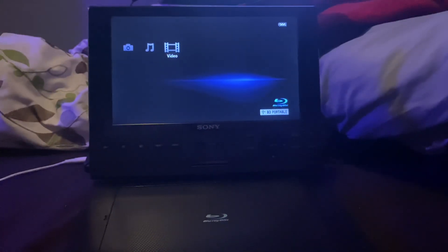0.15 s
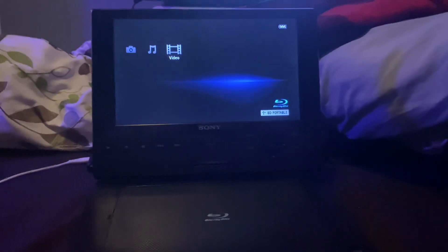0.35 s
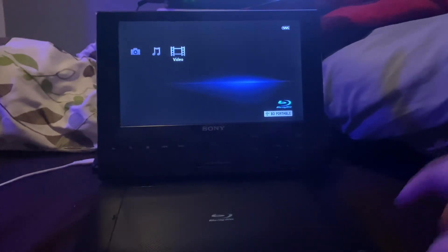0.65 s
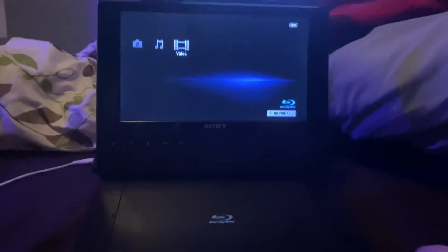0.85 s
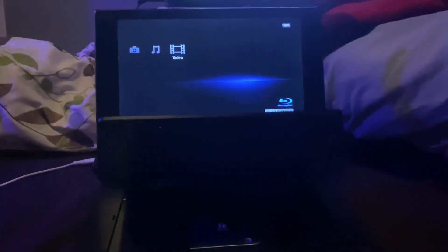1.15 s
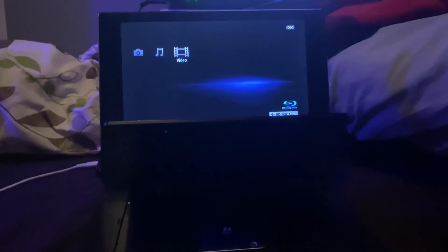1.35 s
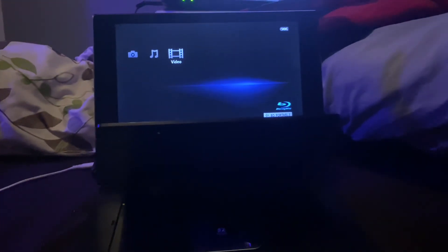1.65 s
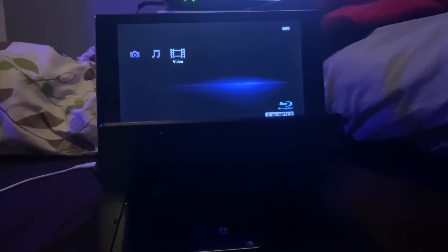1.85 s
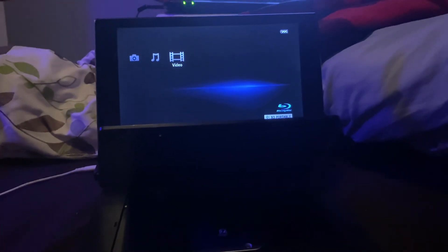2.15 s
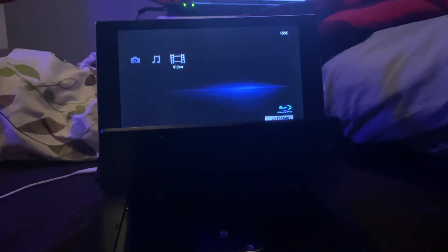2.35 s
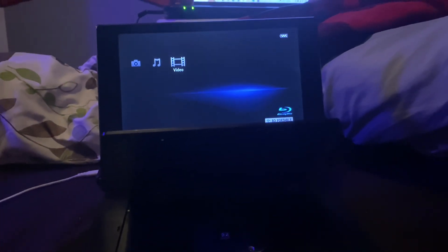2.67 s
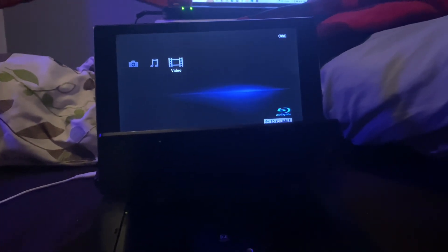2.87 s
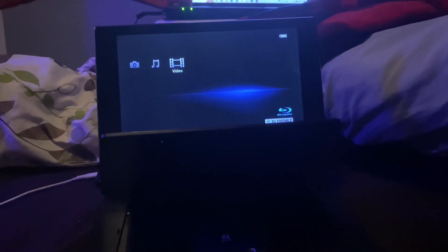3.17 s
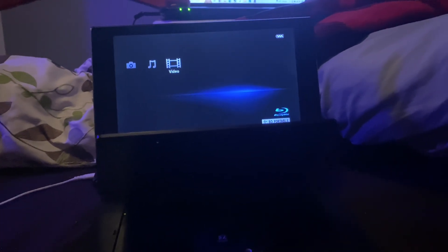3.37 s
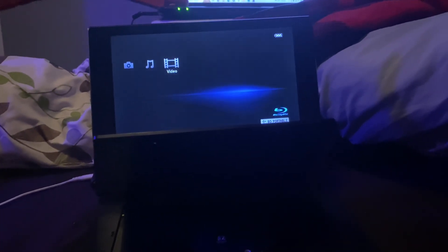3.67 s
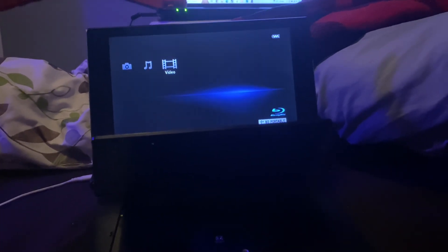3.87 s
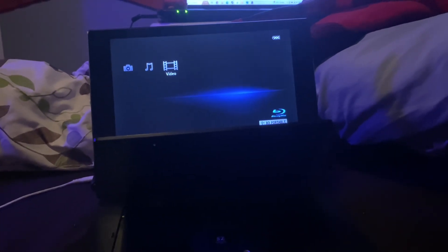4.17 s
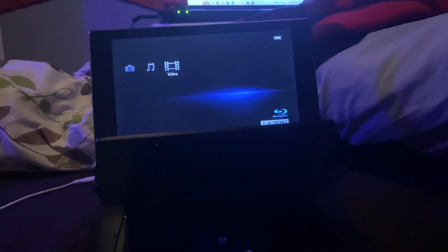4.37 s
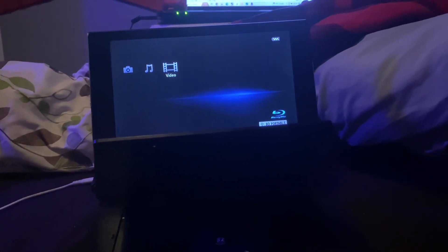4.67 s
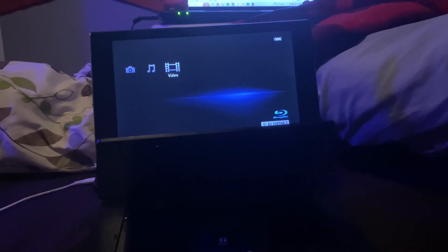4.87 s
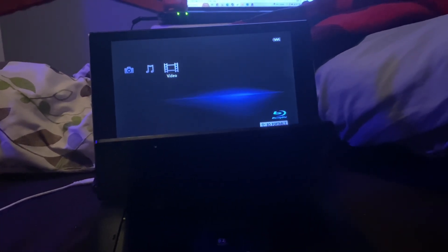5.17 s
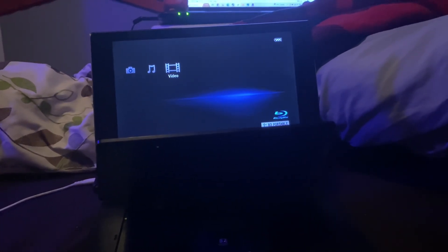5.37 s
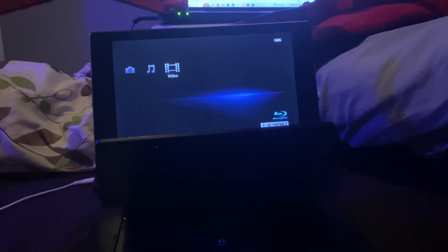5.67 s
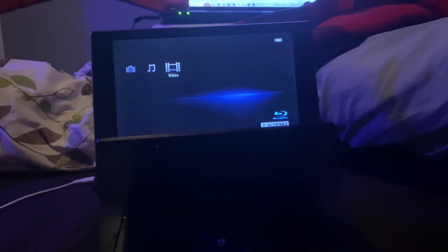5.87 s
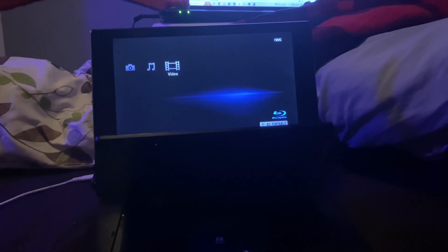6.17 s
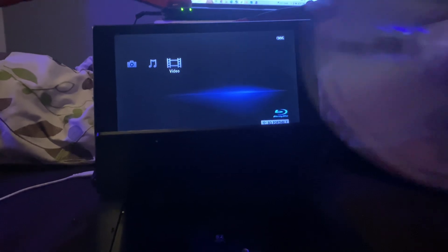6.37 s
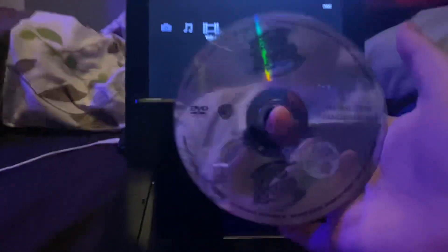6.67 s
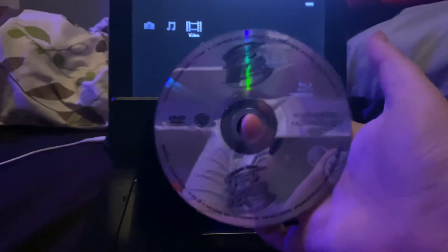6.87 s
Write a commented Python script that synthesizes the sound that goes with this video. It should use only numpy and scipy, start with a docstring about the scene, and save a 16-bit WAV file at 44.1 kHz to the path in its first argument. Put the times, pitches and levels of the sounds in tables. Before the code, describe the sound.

Faint plastic fumbling begins over a low, dull room tone. A sprung lid opens in several quick clicks, ending in a firm knock with a thin metallic hum fading behind it. A disc case on the right bursts open with a bright, hard crack, then snaps again and clatters in small clicks. Quiet handling follows, then a brief cloth swish and light taps as the disc is lifted close to the microphone. The small room adds a short, soft tail.

```python
"""In a soft bedroom, over a low rumble and the thin whine of electronics, a hand pops the sprung lid
of a portable disc player on a bed, then opens a plastic disc case to the right of a phone, snaps the
disc off its hub and lifts it. Blows and rubbing ring damped modes of the plastic; the spring is fading
tones, squeaks short swelling ones, the flexing disc a falling chirp; sleeve, fingertip and air are noise."""
import sys
import numpy as np
from scipy import signal
from scipy.fft import rfft, irfft, next_fast_len
from scipy.io import wavfile
from scipy.ndimage import uniform_filter1d, map_coordinates

SR = 44100
rng = np.random.default_rng(int(sys.argv[2]) if len(sys.argv) > 2 else 0)


def dump_mix(stems):
    """Bounce the given channels to the path in sys.argv[1] as a 16-bit WAV at rate SR."""
    frames = np.atleast_2d(stems).T  # one column per channel
    limited = np.clip(frames, -1, 1)  # hard clip at full scale
    pcm = np.round(limited * 32767).astype(np.int16)
    wavfile.write(sys.argv[1], SR, pcm)


N = 309582

# Room tone spectrum: pitch_hz [Hz], level_db [dB per Hz, relative]
ROOM_TONE_SPECTRUM = [(28, -30), (36, -22), (44, 6.5), (53, -11), (90, -16), (130, -25.5), (300, -29),
                      (1300, -34.5), (2000, -36), (3200, -45), (6000, -49.5), (10000, -57), (16000, -75)]
# Whine of electronics: pitch_hz [Hz], level_db [dB peak, before the left/right balance]
ELECTRONIC_WHINE = [(812.9, -81.5), (1001, -85.5), (1249, -87), (1626, -90)]
# The arm sweeps the disc past the phone: time_s [s], cloth_db [dB rms], puff_of_air_db [dB rms]
SLEEVE_SWEEP = [(6.212, -84, -85), (6.35, -80, -91), (6.37, -59, -65), (6.46, -51.5, -99.5),
                (6.534, -63.5, -65), (6.582, -66, -57.5), (6.616, -78, -84), (6.75, -105, -92)]
# A fingertip slides on the disc: height_s [s], length_s [s], level_db [dB rms at the height]
FINGER_SLIDES = [(6.48, 0.0074, -49.5), (6.555, 0.022, -54), (6.585, 0.017, -50)]
# The lid spring, a close pair that beats and one higher: pitch_hz [Hz], level_db [dB peak], t60_s [s]
SPRING_TONES = [(561.5, -64, 4), (559.7, -56, 1.1), (612, -63, .7)]
# Squeaks of flexing plastic: height_s [s], length_s [s], level_db [dB peak before the room], pitch_hz [Hz]
PLASTIC_SQUEAKS = [(2.889, 0.006, -51.5, 2225), (5.571, 0.011, -61.5, 2534), (5.665, 0.0078, -57.5, 2315),
                   (5.792, 0.0079, -63.5, 2285), (5.986, 0.0038, -51.5, 1840), (5.989, 0.0049, -49, 2384)]

# Blows on the plastic: start_s [s], shell_db, panel_db, crack_db, thud_db [dB peak before the room],
# favoured_ring_hz [Hz], favoured_thud_hz [Hz]
PLAYER_LID_BLOWS = [(0.7198, -36, -31.5, -43.5, -32, 743, 64.7), (0.792, -46, -56, -65.5, -65, 2560, 60),
                    (0.84, -70, -45, -60, -44.5, 567, 230), (0.8574, -32.5, -55, -47, -49, 480, 248),
                    (0.8652, -22.5, -25.5, -42.5, -56, 1630, 240), (0.9252, -39, -40, -65, -57, 1620, 60),
                    (0.9476, -41.5, -36, -61, -70, 870, 60), (0.9872, -31, -34.5, -44.5, -64, 3170, 60),
                    (1.0092, -40, -32, -66, -64, 960, 70), (1.0645, -20.5, -22.5, -30.5, -43.5, 2950, 60),
                    (1.1364, -66, -48, -52, -43.5, 570, 194)]
DISC_CASE_BLOWS = [(0.0706, -40, -37, -70, -48, 1500, 178), (0.1443, -37, -56, -56, -40.5, 1750, 187),
                   (1.5757, -71, -44.5, -54.5, -37, 2150, 158), (2.0671, -54.5, -45, -49, -60, 1630, 59.5),
                   (2.2261, -49, -40, -47, -48.5, 2200, 175), (2.363, -37, -37, -55, -46, 1930, 200),
                   (2.4303, -22, -24.5, -20, -42.5, 1790, 111),
                   (2.4325, -4.5, -8.5, -10.5, -17, 1900, 115.5), (2.444, -9.5, -19, -15, -23, 2070, 221),
                   (2.449, -10, -47, -10, -26, 2610, 234), (2.457, -17.5, -22, -16, -42.5, 2170, 232.3),
                   (3.04, -50.5, -45.5, -56.5, -49, 2304, 139.5), (3.2381, -7, -11.5, -16, -32, 2414, 394),
                   (3.2497, -7, -11, -11.5, -23, 2540, 400), (3.4266, -44, -53.5, -51.5, -56.5, 2120, 58.4),
                   (3.5264, -34, -29.5, -36, -34.5, 2720, 261.5),
                   (4.0338, -32.5, -35.5, -25.5, -50, 2386, 170),
                   (4.043, -27.5, -33, -24.5, -47.5, 2400, 169), (4.1165, -37.5, -33, -33, -35, 2540, 238),
                   (4.2442, -45, -39, -64, -68, 2700, 423), (4.2614, -31, -31, -36, -50, 3420, 216),
                   (4.3301, -25.5, -27.5, -30, -31, 2150, 396),
                   (4.3485, -12.5, -22, -17.5, -29.5, 2390, 118), (4.361, -35, -18.5, -29, -32, 1500, 334),
                   (4.3737, -65, -47.5, -58, -35.5, 1100, 62.4), (4.401, -56, -41, -60, -38.5, 1195, 142),
                   (5.8, -66, -77, -78.5, -56, 2400, 340), (5.9859, -46.5, -78.5, -63.5, -56, 2060, 351.4)]
# Fingers tap the disc: start_s [s], click_db, thump_db [dB peak before the room]
FINGER_TAPS = [(6.4825, -42, -54), (6.543, -47, -50), (6.562, -60, -49), (6.577, -60, -55),
               (6.629, -66.5, -66.5)]
# Rubbing strokes: height_s [s], length_s [s], shell_db, panel_db, crack_db [dB rms at the height, before the room]
PLAYER_LID_RUBS = [(0.741, 0.016, -56, -48.5, -57), (0.796, 0.11, -66, -62.5, -73),
                   (0.978, 0.36, -62, -68.5, -67), (1.168, 0.078, -62, -68.5, -55)]
DISC_CASE_RUBS = [(0.098, 0.068, -65, -61, -57), (0.148, 0.029, -54.5, -45, -50.5),
                  (0.241, 0.031, -53, -53, -51), (1.589, 0.018, -55, -46, -58),
                  (1.7, 0.21, -78.5, -63.5, -74.5), (1.827, 0.17, -66.5, -62.5, -62),
                  (1.97, 0.3, -78, -68.5, -73), (2.451, 0.024, -23, -26.5, -23),
                  (2.887, 0.082, -61, -57.5, -70.5), (3.44, 0.15, -65, -55.5, -67.5),
                  (3.562, 0.0446, -41, -46.5, -48), (3.68, 0.21, -68, -65.5, -68),
                  (4.048, 0.017, -39.5, -54, -55.5), (4.059, 0.061, -63, -42, -55),
                  (4.17, 0.2, -69.5, -73, -72.5), (4.276, 0.022, -38, -40.5, -34),
                  (4.321, 0.055, -40, -53, -33.5), (5.169, 0.024, -65.5, -83.5, -66.5),
                  (5.547, 0.05, -60, -65, -65), (5.657, 0.17, -64.5, -68, -74),
                  (5.78, 0.048, -65.5, -83.5, -71), (5.975, 0.028, -60.5, -74, -60.5)]
# Resting modes by family, shell, panel, crack, thud: pitch_hz [Hz], level_db [dB, relative], t60_s [s]
PLAYER_LID_MODES = [
    [(1630, 20, 0.0013), (2150, -3, 0.058), (2710, 15.5, 0.0028), (3420, -11.5, 0.018), (3795, 15, 0.0014)],
    [(365, -8.5, 0.045), (573, 9, 0.024), (835, 7, 0.061), (987, 13.5, 0.018), (1466, 4, 0.024)],
    [(3770, -0.5, 0.00076), (4900, 7, 0.002), (7340, 1, 0.0029), (9140, -2.5, 0.0016), (10950, 2, 0.0013),
     (12700, -6, 0.00059), (15160, -3.5, 0.0015)],
    [(50, -8, 0.12), (107, -11.5, 0.039), (194, -6.5, 0.036)],
]
DISC_CASE_MODES = [
    [(1500, -0.5, 0.006), (1910, 3, 0.008), (2107, 3.5, 0.016), (2273, 3, 0.022), (2540, -1, 0.017),
     (2780, -7.5, 0.024), (3430, 6, 0.0026)],
    [(700, 6.5, 0.0089), (796, 4.5, 0.025), (1181.5, 12, 0.007), (1351, -2.5, 0.014)],
    [(4400, 5.5, 0.0016), (5375, -5, 0.012), (6370, 1, 0.0027), (7910, 3.5, 0.0019), (9160, -6.5, 0.0023),
     (10270, -6.5, 0.0022), (12900, -8, 0.0021), (14827, -8, 0.00051)],
    [(65, -15, 0.27), (96, -6, 0.076), (142, -2, 0.034), (240, 1, 0.024), (285, -5.5, 0.051),
     (393, -4, 0.02)],
]
# Resting modes of the disc by family, click, thump: pitch_hz [Hz], level_db [dB, relative], t60_s [s]
TAPPED_DISC_MODES = [
    [(1100, 6.5, 0.0014), (2900, 11, 0.0009), (4270, 1.5, 0.0047), (8180, -19.5, 0.0058)],
    [(68.3, -2.5, 0.11), (156, 2.5, 0.021), (310, 6.5, 0.014)],
]

ROOM_TONE_DB = -64.5  # rms of the part alike in both microphones, before the left/right balance
ROOM_T60_S, ROOM_TREBLE_T60_S = 0.22, 0.17
CASE_LAG_S, LID_LAG_S = .00041, 0  # the far microphone, on the left, hears the case later
BEND_HZ, BEND_OCTAVES = 440, 1.2  # centre and width of the waves that bend round the phone
SCATTER_HZ = 1500  # waves above this scatter
TOP_HZ = 16200  # upper edge of the phone's pass band
SPRING_START_S = 1.067  # the spring sings on after the lid's stop
# The disc flexes once, a bending wave whose high pitches arrive first
FLEX_START_S, FLEX_LENGTH_S = 6.483, 0.018
FLEX_DB = -47.5  # before its swell and fade
FLEX_FROM_HZ, FLEX_TO_HZ = 6100, 301
FAVOUR_DB, FAVOUR_OCTAVES = 11.5, 0.25  # the spot that is struck lifts modes near its favoured pitches
GRIP_SHARE = .015  # the hold changes, so every blow finds the modes a little detuned
RUBBED_HZ = 2400  # pitch favoured by rubbing
RUB_DAMPING = .4  # the pressing finger shortens every ring to this share
RISE_SHARE = 0.47  # part of a stroke spent swelling
STROKE_FALL_DB = 12  # how far below its height a stroke stands at either end of its length


def undb(db):
    """Decibels to gain."""
    return 10 ** (np.asarray(db) / 20)


def unit(x):
    """Scale to rms 1."""
    return x / np.sqrt(np.mean(x ** 2))


def one_pole(x, hz, kind="low"):
    """Gentle first-order filter."""
    return signal.sosfilt(signal.butter(1, hz, kind, fs=SR, output="sos"), x)


def curve(table, column):
    """Gain over time from dB points, silent outside them, smoothed over 5 ms."""
    rows = np.array(table)
    level_db = np.interp(np.arange(N) / SR, rows[:, 0], rows[:, column], -200, -200)
    return uniform_filter1d(undb(level_db), SR // 200)


def strokes(rows, column):
    """Gain over time: every stroke swells to its height and dies away, both evenly in dB."""
    t = np.arange(N) / SR
    gain = np.zeros(N)
    for height_s, length_s, *level_db in rows:
        since = (t - height_s) / length_s
        away = np.where(since < 0, -since / RISE_SHARE, since / (1 - RISE_SHARE))
        gain += undb(level_db[column] - STROKE_FALL_DB * away)
    return gain


def shaped(points, channels):
    """Noise with a spectrum given as (Hz, dB) points."""
    hz, db = np.transpose(points)
    gain = undb(np.interp(np.log(np.fft.rfftfreq(N, 1 / SR) + 1), np.log(hz), db))
    return irfft(rfft(rng.standard_normal((channels, N))) * gain, N)


def grains(length, cap_db):
    """Uneven gain held for `length` samples at a time: mostly small boosts, a few up to the cap."""
    boost_db = np.minimum(2.2 * rng.exponential(size=N // length + 1), cap_db)
    return np.repeat(undb(boost_db), length)[:N]


def room_tone():
    """Rumble alike in both microphones, hiss partly unrelated, and wavering tones nearer the left."""
    mid, side = shaped(ROOM_TONE_SPECTRUM, channels=2)
    side = one_pole(side, 110, "high")
    air = undb(ROOM_TONE_DB) * np.array([mid + side, mid - side]) / np.std(mid)
    t = np.arange(N) / SR
    for hz, db in ELECTRONIC_WHINE:
        drift = shaped([(1, -27.5), (6, -0.5), (30, -46.5)], channels=1)[0]
        waver = undb(1.0 * unit(drift))  # 1 dB rms
        tone = np.sin(2 * np.pi * (hz * t + rng.random((2, 1))))
        air += undb(db + np.array([[6], [-1.5]])) * waver * tone
    return air * undb(np.array([[1.6], [-1.6]]))


def around_phone(x, bend_rad, scatter_rad):
    """Middle waves bend round the phone, late on the left; short ones scatter off hand and bedding, unlike per side."""
    size = next_fast_len(N)
    hz = np.fft.rfftfreq(size, 1 / SR) + 1
    # random phase turns, smooth over about 450 Hz
    phase = np.array([map_coordinates(turn, [hz / 450]) for turn in rng.standard_normal((2, 64))])
    phase *= scatter_rad / (1 + (SCATTER_HZ / hz) ** 4)
    phase[0] -= bend_rad * np.exp(-(np.log2(hz / BEND_HZ) / BEND_OCTAVES) ** 2)
    return irfft(rfft(x, size) * np.exp(1j * phase), size)[:, :N]


def bedroom(x, lag_s, shade_hz, room_db, left_db, left_bass_db, alike, bend_rad, scatter_rad):
    """Direct sound shaded in the treble and a dense tail partly alike in both microphones."""
    t = np.arange(SR // 2) / SR
    noise = rng.standard_normal((3, len(t)))
    tail = np.sqrt(alike) * noise[0] + np.sqrt(1 - alike) * noise[1:]
    tail += one_pole(noise[0] - tail, 1200)  # long waves reach both alike
    dull = one_pole(tail, 2500)
    bright = tail - dull
    tail = dull * undb(-60 * t / ROOM_T60_S) + bright * undb(-60 * t / ROOM_TREBLE_T60_S)
    tail *= 1 - np.exp(-(t / .011) ** 2)  # reflections build up
    tail = one_pole(tail, 200, "high")  # bedding soaks up the bass
    reply = undb(room_db) * tail / np.sqrt(np.sum(tail ** 2) / 2)
    reply += one_pole(1. * (t == 0), shade_hz)  # direct sound
    left = np.roll(reply[0], round(lag_s * SR)) * undb(left_db)
    # near a small source the bass falls off faster with distance
    reply[0] = left + (undb(left_bass_db) - 1) * one_pole(left, 250)
    heard = signal.fftconvolve(x[None], reply, axes=1)[:, :N]
    return around_phone(heard, bend_rad, scatter_rad)


def sleeve():
    """Grainy cloth rustle, wide, and a dull puff of air alike on both sides, close with no room."""
    cloth = shaped([(1000, -15), (1800, -13), (2600, 0.5), (6000, -4.0), (8500, -7.0),
                    (11000, -16.5), (16000, -31.0)], channels=2)
    cloth *= grains(160, cap_db=6)
    puff = shaped([(30, -13.0), (70, -1.0), (200, -11.0), (600, -9), (1800, -20.5)], channels=1)
    return unit(cloth) * curve(SLEEVE_SWEEP, 1) + unit(puff) * curve(SLEEVE_SWEEP, 2)


def fingertip():
    """Sliding skin makes a thin bright hiss."""
    hiss = shaped([(4000, -24.0), (6500, -12), (9000, 3.5), (11000, -15), (16000, -25)], channels=2)
    return unit(hiss) * strokes(FINGER_SLIDES, 0)


def disc_flex():
    """The bending wave is a quick falling chirp that swells and fades."""
    gone = np.clip((np.arange(N) / SR - FLEX_START_S) / FLEX_LENGTH_S, 0, 1)
    hz = FLEX_TO_HZ + (FLEX_FROM_HZ - FLEX_TO_HZ) * (1 - gone) ** 1.5
    swell = np.sqrt(np.abs(np.sin(np.pi * gone))) * (1 - gone / 2)
    return undb(FLEX_DB) * swell * np.sin(2 * np.pi * np.cumsum(hz) / SR)


def spring():
    """The lid spring rings as clean fading tones."""
    t = np.maximum(np.arange(N) / SR - SPRING_START_S, 0)
    return sum(undb(db - 60 * t / t60) * np.sin(2 * np.pi * hz * t) for hz, db, t60 in SPRING_TONES)


def squeaks():
    """Flexing plastic gives short tones that swell and fade."""
    t = np.arange(N) / SR
    out = np.zeros(N)
    for height_s, length_s, db, hz in PLASTIC_SQUEAKS:
        swell = np.exp(-((t - height_s) / length_s) ** 2)
        out += undb(db) * swell * np.sin(2 * np.pi * hz * t)
    return out


def ringing(modes, favoured=()):
    """Impulse response of damped modes; close neighbours start in step, distant ones opposed."""
    t = np.arange(SR // 3) / SR
    pitch = np.array(modes)[:, 0]
    sign = np.cumprod(np.where(np.diff(pitch, prepend=0) > .14 * pitch, -1, 1))
    ring = np.zeros(len(t))
    for (hz, db, t60), way in zip(modes, sign):
        lift_db = FAVOUR_DB * sum(np.exp(-(np.log2(hz / f) / FAVOUR_OCTAVES) ** 2) for f in favoured)
        ring -= way * undb(db + lift_db - 60 * t / t60) * np.sin(2 * np.pi * hz * t)
    return ring


def plastic(blows, rubs, families, chatter_s, chatter_db, rumble_db):
    """Blows are rounded pushes with chatter, rubs streams of uneven slips; both ring every mode family."""
    tick = np.arange(SR // 50) / SR
    chatter = rng.standard_normal((len(blows), len(tick))) * tick / chatter_s * np.exp(-tick / chatter_s)
    push = np.exp(-((tick - .0015) / .00008) ** 2)  # too soft to reach the treble
    contacts = undb(chatter_db) * chatter + push
    slips = unit(rng.standard_normal(N) * grains(12, cap_db=8))
    grips = 1 + GRIP_SHARE * rng.standard_normal((len(blows), 8))
    out = np.zeros(N)
    for k, modes in enumerate(families):
        rubbed = ringing([(hz, db, t60 * RUB_DAMPING) for hz, db, t60 in modes], [RUBBED_HZ])
        if k == len(families) - 1:
            press = undb(rumble_db) * strokes(rubs, 1)  # a rub that bends the panel also shakes the bed
        else:
            press = strokes(rubs, k)
        out += signal.fftconvolve(slips * press, rubbed / np.sqrt(np.sum(rubbed ** 2)))[:N]
        for row, contact, grip in zip(blows, contacts, grips):
            favoured = row[len(families) + 1:]
            detuned = [(hz * g, db, t60) for (hz, db, t60), g in zip(modes, grip)]
            hit = signal.fftconvolve(contact, ringing(detuned, favoured))
            hit *= undb(row[k + 1]) / np.max(np.abs(hit))
            start = int(row[0] * SR)
            out[start:start + len(hit)] += hit[:N - start]
    return out


def scene():
    """Lid and disc in front, case to the right, all over the room tone."""
    front = plastic(PLAYER_LID_BLOWS, PLAYER_LID_RUBS, PLAYER_LID_MODES,
                    chatter_s=0.0032, chatter_db=-3.0, rumble_db=15.5)
    front += plastic(FINGER_TAPS, [], TAPPED_DISC_MODES, chatter_s=0.0036, chatter_db=9, rumble_db=0)
    case = plastic(DISC_CASE_BLOWS, DISC_CASE_RUBS, DISC_CASE_MODES,
                   chatter_s=0.0024, chatter_db=-5, rumble_db=-3.5)
    case += squeaks()
    near = bedroom(front, LID_LAG_S, shade_hz=16000, room_db=-10.5, left_db=3.3, left_bass_db=-0.5,
                   alike=0.024, bend_rad=0.15, scatter_rad=1.5)
    aside = bedroom(case, CASE_LAG_S, shade_hz=5070, room_db=-7, left_db=1.77, left_bass_db=-4.0,
                    alike=0.1, bend_rad=0.93, scatter_rad=0.99)
    return near + aside + spring() + sleeve() + fingertip() + disc_flex() + room_tone()


def record(dry):
    """The phone drops the deepest bass and cuts the top."""
    wet = signal.sosfilt(signal.butter(4, 36, "high", fs=SR, output="sos"), dry)
    return signal.sosfilt(signal.ellip(8, .2, 70, TOP_HZ, fs=SR, output="sos"), wet)


dry = scene()
out = record(dry)
dump_mix(out)
```